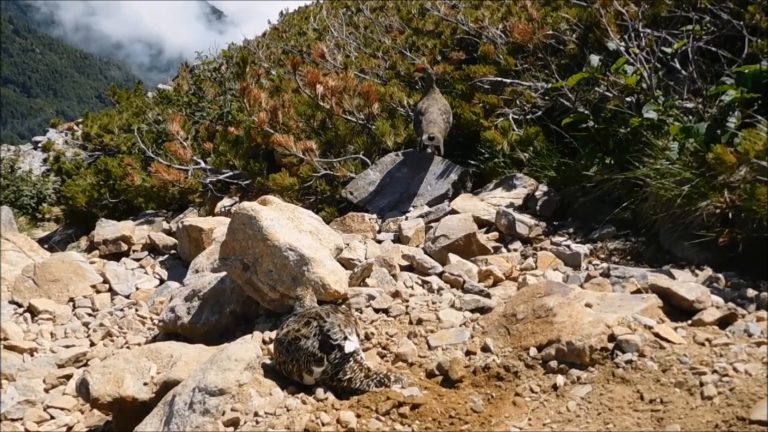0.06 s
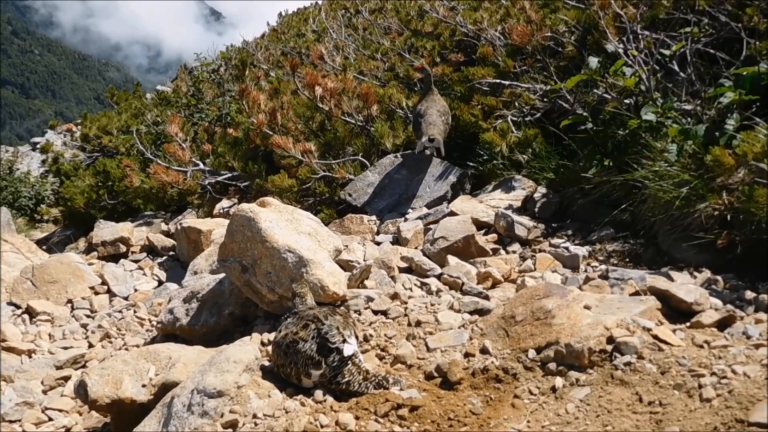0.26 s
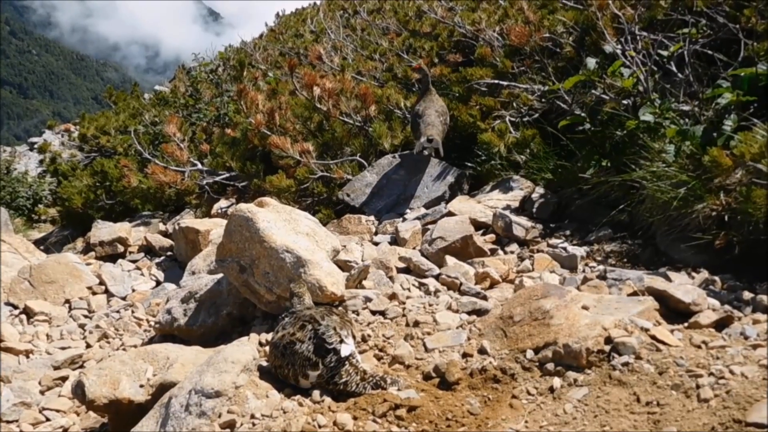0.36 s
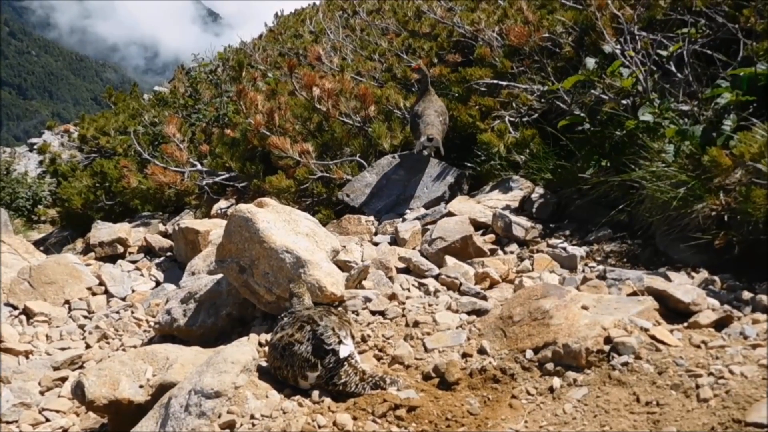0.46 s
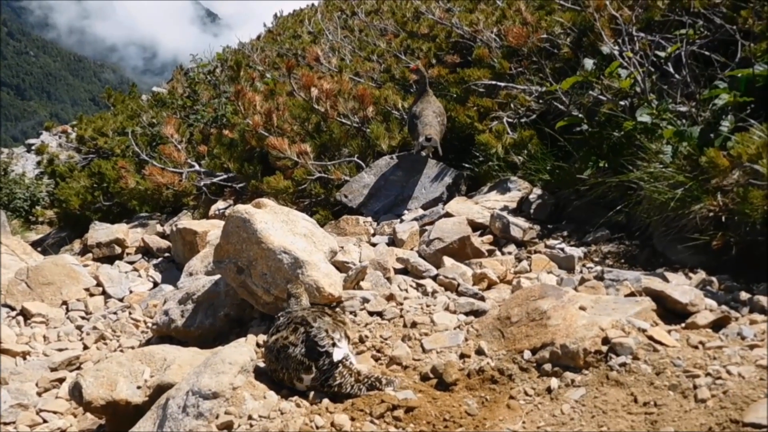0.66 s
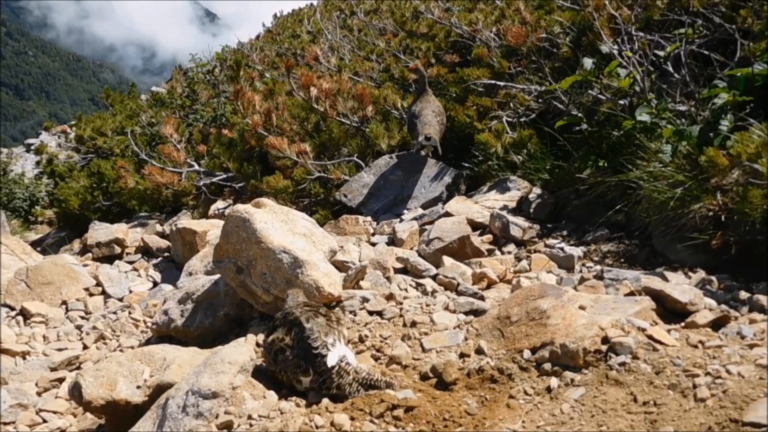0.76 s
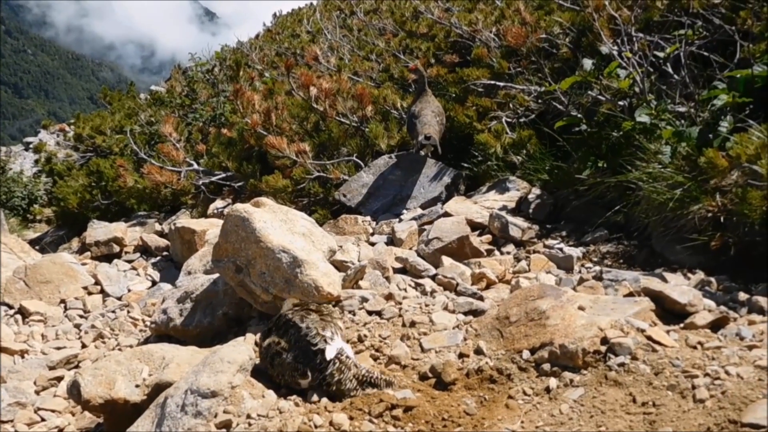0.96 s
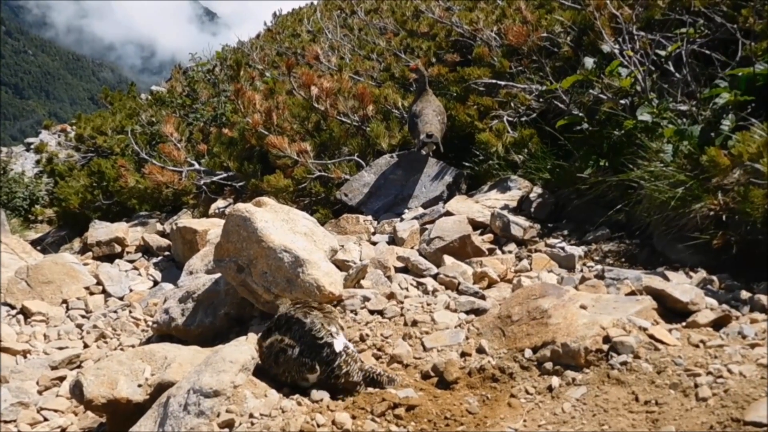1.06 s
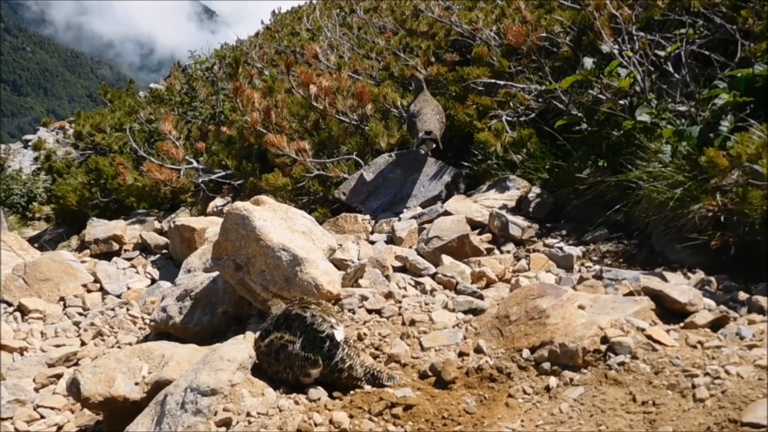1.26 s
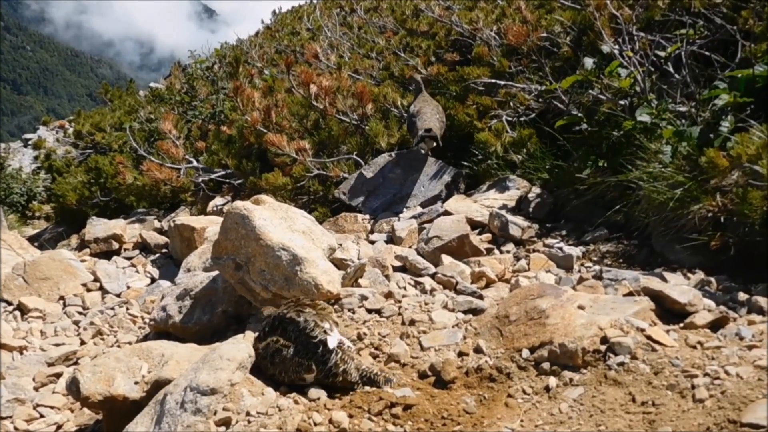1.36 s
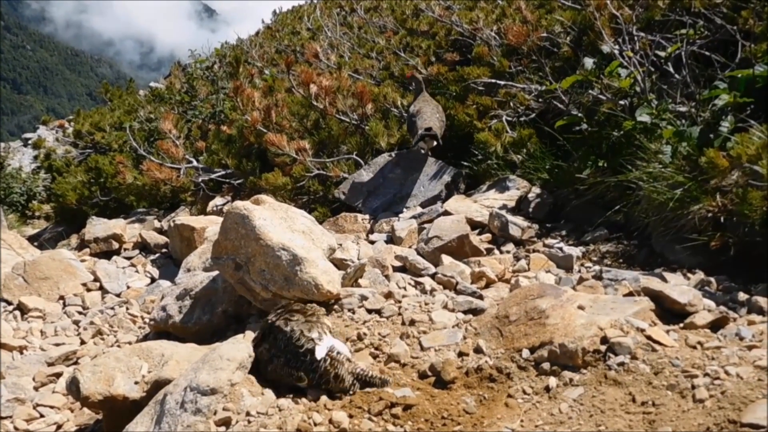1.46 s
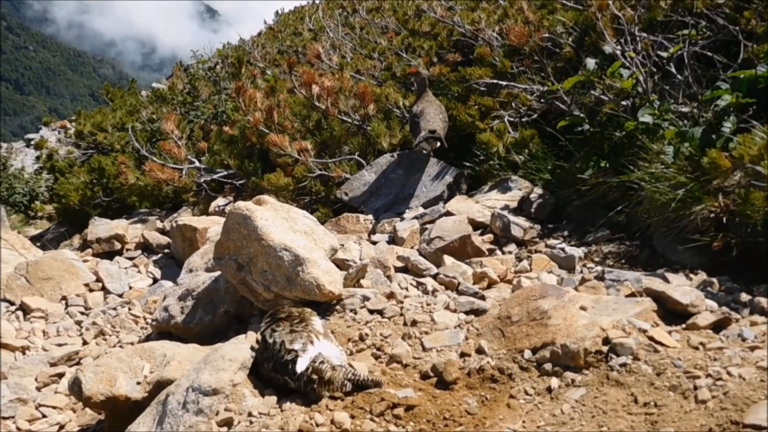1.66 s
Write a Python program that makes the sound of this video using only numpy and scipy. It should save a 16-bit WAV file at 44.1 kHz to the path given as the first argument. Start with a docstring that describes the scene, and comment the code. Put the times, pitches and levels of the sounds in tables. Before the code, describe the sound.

Wind thumps the left microphone in a quick, hard burst, overlapping the end of a ptarmigan's faint, dry rattle. Lighter bumps, one small stone clink and soft grit scuffs follow over the quiet rush of a mountain valley.

```python
"""A ptarmigan gives a short, dry rattle: five pulses ring its throat and echo off the rocks.
Eddies (swirls of wind) thump the left microphone, hard at first and then lightly, with faint ticks.
One stone clinks against another and loose grit scuffs on the mountainside.
Behind it all is the steady rush of distant air and water in the valley."""
import sys
import numpy as np
from scipy import signal
from scipy.fft import rfft, irfft
from scipy.io import wavfile

SR = 44100
rng = np.random.default_rng(int(sys.argv[2]) if len(sys.argv) > 2 else 0)


def put_to_file(sound):
    """Save the sound as 16-bit audio at rate SR, in the file named by the first command-line argument."""
    columns = np.atleast_2d(sound).T  # one column per channel
    safe = np.clip(columns, -1, 1)
    whole_steps = np.round(safe * 32767)
    wavfile.write(sys.argv[1], SR, whole_steps.astype(np.int16))


N = 74970
T = np.arange(N) / SR

# The tone of the valley's rush. Each row: frequency in Hz, relative level in dB.
VALLEY_TONE = [(25, 13), (60, 8), (130, -15), (220, -3.5), (380, -4.5), (800, 2.5), (1100, 2), (2000, -3.5),
               (4000, -11), (8000, -17.5), (15000, -21.5)]
# How the rush swells. Each row: time in seconds, added level in dB.
VALLEY_SWELL = [(0, 0), (.5, 1), (.9, 1.94), (1.1, 2.4), (1.4, 0), (1.7, 2)]
# The notes a struck stone rings with. Each row: pitch in Hz, relative level in dB, fade time in seconds.
STONE_NOTES = [(832, 3, 0.073), (1290, -5, .035), (1760, 2, 0.025), (2180, -22, 0.085)]
# Scuffs of grit. Each row: middle in seconds, level in dB, half length in seconds, brightness in Hz.
GRIT_SCUFFS = [(.84, -60.5, 0.013, 6000), (1.053, -48.5, 0.011, 2120), (1.582, -50, 0.0065, 4000),
               (1.599, -47, 0.0017, 4900)]
# The tone of a scuff. Each row: multiple of its brightness, relative level in dB.
GRIT_TONE = [(.06, -24), (.3, 3), (1, 2), (2, -6.5), (4, -17.5), (8, -20)]
# Faint ticks of wind crackle on the left microphone. Each row: start in seconds, level in dB.
WIND_TICKS = [(0.564, -52), (.600, -50), (.720, -53), (.773, -61), (.838, -52), (1.088, -47), (1.516, -49),
              (1.524, -51), (1.686, -47.5)]
# The strength of the wind. Each row: time in seconds, level in dB.
GUST_LEVELS = [(0, -54.5), (.09, -61.5), (.15, -48.5), (.2, -46.5), (.228, -45), (.25, -33), (.315, -42.5),
               (.37, -57.5), (.53, -58.5), (.6, -49.5), (.65, -54), (.77, -49), (.83, -65), (1.04, -58),
               (1.1, -47.5), (1.17, -63), (1.24, -48), (1.34, -62.5), (1.41, -52), (1.48, -63.5),
               (1.52, -39), (1.56, -59), (1.66, -65.5), (1.7, -48.5)]
# The tones of the wind's three layers. Each row: frequency in Hz, relative level in dB.
RUMBLE_TONE = [(20, -0.5), (60, -0.5), (140, -3.5), (220, -2), (400, -15.5), (800, -19), (2000, -61)]
CHURN_TONE = [(20, -7), (150, 2), (350, -13.5), (700, -4.5), (1300, -20), (2500, -27), (6000, -52)]
CRACKLE_TONE = [(300, -28), (1800, 6), (3500, -5), (7000, -12.5), (15000, -17.5)]
# Eddies hitting the microphone. Each row: middle in seconds, level in dB, pitch in Hz,
# ringing (1 is a dull thump, 10 a hollow knock).
EDDY_HITS = [(0.1952, -35.5, 218, 4.6), (0.2123, -3, 416, 1.68), (0.2155, -16.5, 454, 1.8),
             (.2260, -29, 500, 23), (0.2445, -16.5, 340, 1.7), (0.249, -22, 460, 6.5),
             (0.2577, -15.5, 232, 3.7), (.2621, -10, 523, 4.3), (0.2727, -20, 443, 3.9),
             (0.2828, -18.5, 340, 6.1), (0.3046, -3, 580, 4.26), (0.3094, -18.5, 362, 2.9),
             (0.319, -30, 330, 6), (.3360, -34.5, 230, 4.6), (0.5997, -28, 220, 0.92),
             (0.6145, -25, 315, 17), (.7210, -28.5, 203, 2.2), (0.765, -41.5, 69, 5.1),
             (0.7747, -33.5, 277, 6.4), (0.976, -42.5, 42, 6), (1.521, -34, 65, 2), (1.5238, -29, 474, 1.7),
             (1.687, -43, 50, 3.7)]
# The notes the bird's throat rings with. Each row: pitch in Hz, relative level in dB,
# fade time in seconds.
THROAT_NOTES = [(860, 0, 0.01), (1370, 1.5, 0.014), (1515, -3.5, 0.011), (2640, -11, 0.012)]
# The pulses of the rattle. Each row: start in seconds, strength in dB.
RATTLE_PULSES = [(0.1165, -38), (0.1497, -36), (0.1829, -36), (0.2157, -49), (0.255, -45)]


def gain(db):
    """Turn decibels into a number to multiply a sound by."""
    return 10 ** (np.asarray(db) / 20)


def curve(rows):
    """Join (time, value) rows with straight lines."""
    return np.interp(T, *np.array(rows).T)


def pan(db):
    """Left and right gains that make the left side louder by db."""
    return gain(np.array([[db], [-db]]) / 2)


def noise(tone):
    """Noise of strength 1, shaped by (Hz, dB) rows."""
    hz, db = np.array(tone).T
    frequencies = np.maximum(np.fft.rfftfreq(N, 1 / SR), 1)
    shape = gain(np.interp(np.log(frequencies), np.log(hz), db))
    shaped = irfft(rfft(rng.standard_normal(N)) * shape, N)
    return shaped / shaped.std()


def fade(start, fade_s):
    """Start suddenly, then die away by 60 dB every fade_s seconds."""
    return (T >= start) * np.exp(-np.log(1000) * np.maximum(T - start, 0) / fade_s)


def ring(start, notes):
    """Something struck once rings with several fading notes."""
    return sum(gain(db) * fade(start, fade_s) * np.sin(2 * np.pi * hz * (T - start))
               for hz, db, fade_s in notes)


def lowpass(sound, hz, order):
    """Soften everything above hz; a higher order cuts more steeply."""
    return signal.sosfilt(signal.butter(order, hz, fs=SR, output="sos"), sound)


def grains(db):
    """A grainy gain that jumps every 32 samples, at random within plus or minus db."""
    return gain(db * np.repeat(rng.uniform(-1, 1, N), 32)[:N])


def valley():
    """Distant air and water make a wide, even rush."""
    shared = 0.13  # share of the power that is the same on both sides
    middle = np.sqrt(shared) * noise(VALLEY_TONE)
    sides = np.sqrt(1 - shared) * np.array([noise(VALLEY_TONE), noise(VALLEY_TONE)])
    return pan(1.5) * gain(-55.5 + curve(VALLEY_SWELL)) * (middle + sides)


def stone_clink(start=0.9135):
    """One stone hits another: a sharp click, a longer crack and a brief ring."""
    contact_noise = noise([(200, -6), (800, 19), (2000, 4.5), (4000, -10), (15000, -51)])
    click = gain(-35.5) * fade(start, fade_s=0.0075)
    crack = gain(-49) * fade(start, fade_s=0.13)
    return pan(7) * (gain(-46) * ring(start, STONE_NOTES) + (click + crack) * contact_noise)


def grit():
    """Loose grit scuffs in short bursts on both sides."""
    sound = np.zeros((2, N))
    for middle, db, half_length, hz in GRIT_SCUFFS:
        tone = [(hz * multiple, level) for multiple, level in GRIT_TONE]
        burst = gain(db) * np.exp(-.5 * ((T - middle) / half_length) ** 2)
        sound += burst * np.array([noise(tone), noise(tone)])
    return sound


def wind_ticks():
    """Wind crackles in faint ticks on the left microphone."""
    ticks = sum(gain(db) * fade(start, fade_s=0.015) for start, db in WIND_TICKS)
    return np.array([ticks * rng.standard_normal(N), np.zeros(N)])


def eddies():
    """Each eddy pushes on the microphone between two moments of suction, with a trace of crackle."""
    push, crackle_level = np.zeros(N), np.zeros(N)
    for middle, db, hz, ringing in EDDY_HITS:
        age = T - middle
        # A very short wave, strongest at its middle; more ringing gives it more swings.
        push += gain(db) * np.real((1 - 2j * np.pi * hz * age / ringing) ** -(ringing + 1))
        crackle_level += gain(db / 2 - 41) * np.exp(-np.abs(age) / 0.0023)
    return lowpass(push, hz=1470, order=4) + crackle_level * noise(CRACKLE_TONE)


def wind():
    """Wind rumbles on the left microphone and churns as gusts grow; the right one is sheltered."""
    gust_db = curve(GUST_LEVELS)
    strong_gust_db, growth = -28.5, 1.38  # the churn grows faster than the gust does
    churn_level = gain(-30 + growth * (gust_db - strong_gust_db))
    churn = noise(CHURN_TONE)
    crackle = gain(-13) * grains(10) * noise(CRACKLE_TONE)
    rumble = gain(gust_db) * noise(RUMBLE_TONE)
    left = rumble + churn_level * (churn + crackle) + eddies()
    leak = gain(-16.5) * lowpass(left, hz=168, order=1)
    right = leak + gain(gust_db - 20) * noise(RUMBLE_TONE)
    return np.array([left, right])


def ptarmigan(rise_s=0.00067):
    """Each soft-edged pulse rings the bird's throat; the rocks scatter a short echo."""
    rattle = np.zeros(N)
    for start, db in RATTLE_PULSES:
        soft_edge = 1 - np.exp(-np.maximum(T - start, 0) / rise_s)
        rattle += gain(db) * ring(start, THROAT_NOTES) * soft_edge
    rocks = rng.standard_normal((2, N)) * fade(0, fade_s=0.048)
    rocks /= np.sqrt((rocks ** 2).sum(axis=1, keepdims=True))  # scale each side to an energy of 1
    echo = signal.fftconvolve(rattle[None], rocks, axes=1)[:, :N]
    return pan(1) * (rattle + gain(-6) * echo)


def scene():
    """The bird, wind, stone and grit sound together over the valley."""
    return ptarmigan() + wind() + stone_clink() + (wind_ticks() + grit()) * grains(5.5) + valley()


def record(dry):
    """Cut away the very highest treble."""
    top_hz = 15850
    return signal.sosfilt(signal.ellip(10, .1, 60, top_hz, fs=SR, output="sos"), dry)


dry = scene()
out = record(dry)
put_to_file(out)
```